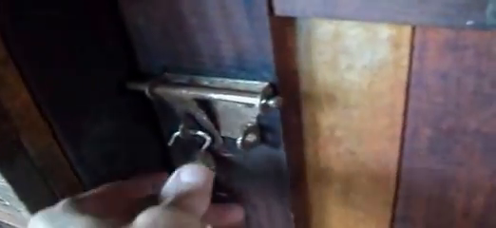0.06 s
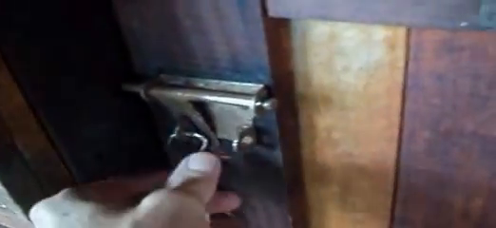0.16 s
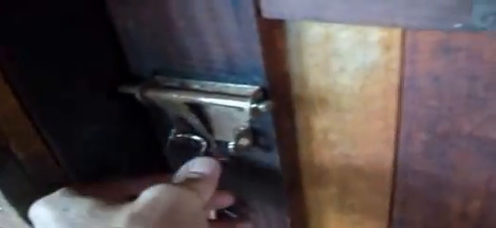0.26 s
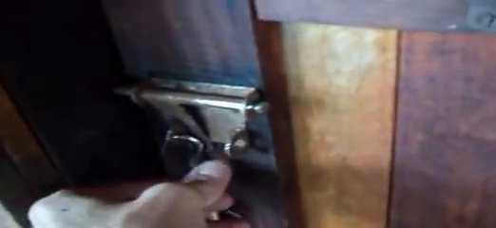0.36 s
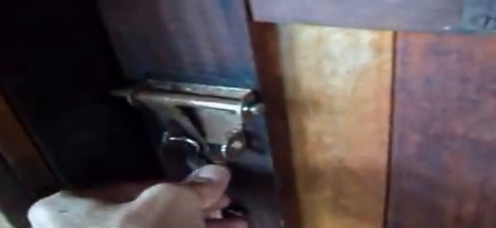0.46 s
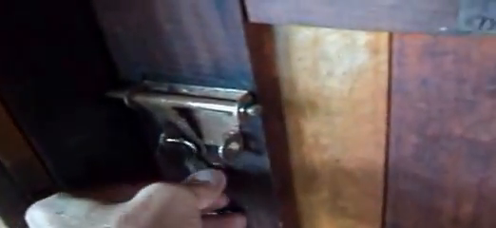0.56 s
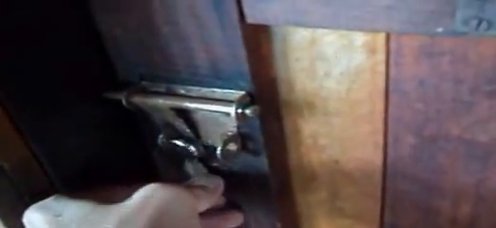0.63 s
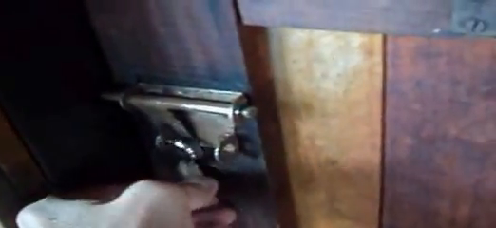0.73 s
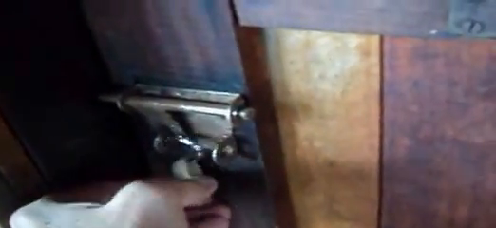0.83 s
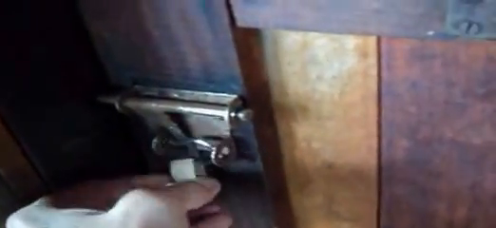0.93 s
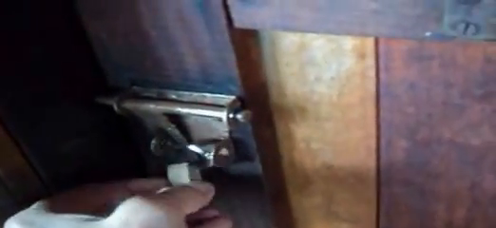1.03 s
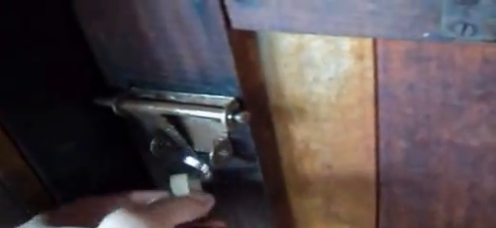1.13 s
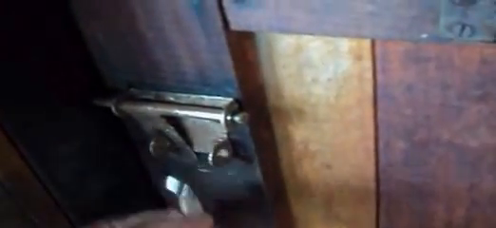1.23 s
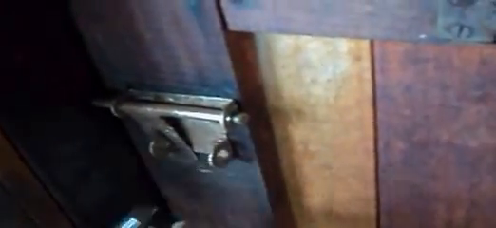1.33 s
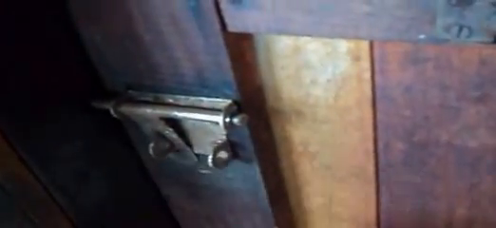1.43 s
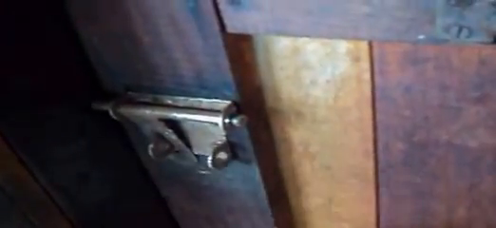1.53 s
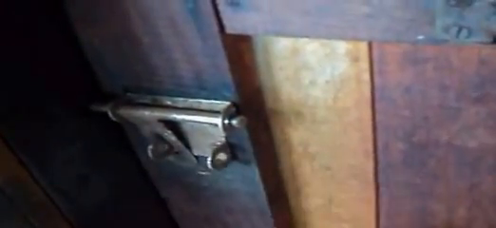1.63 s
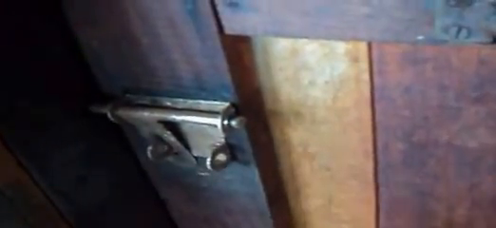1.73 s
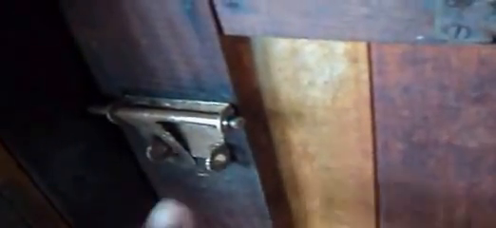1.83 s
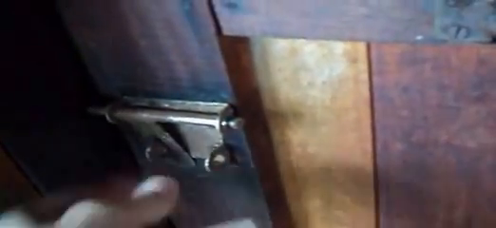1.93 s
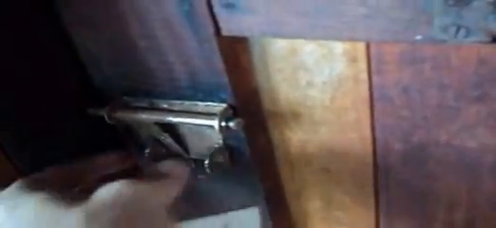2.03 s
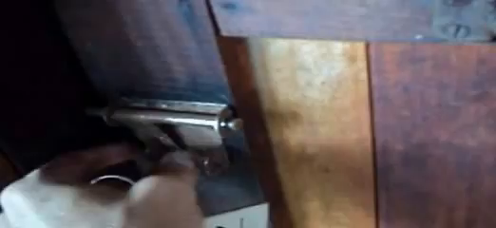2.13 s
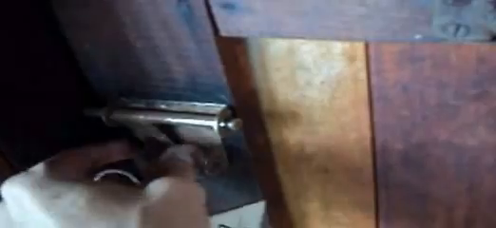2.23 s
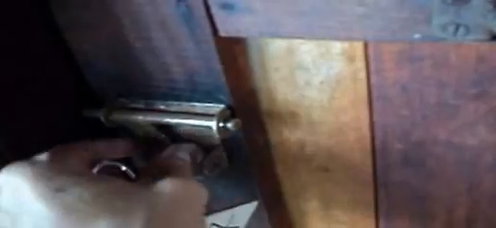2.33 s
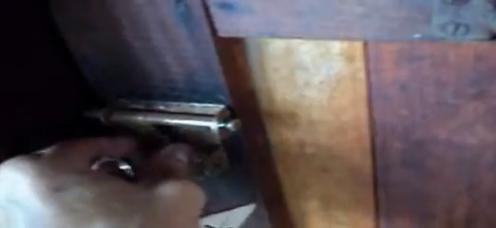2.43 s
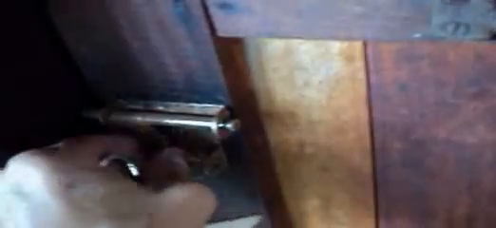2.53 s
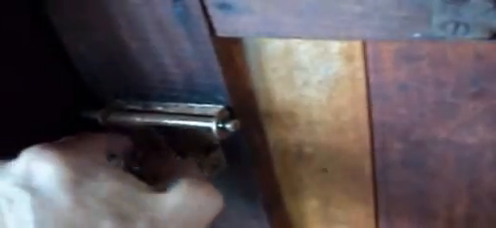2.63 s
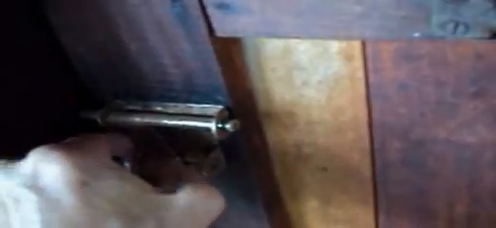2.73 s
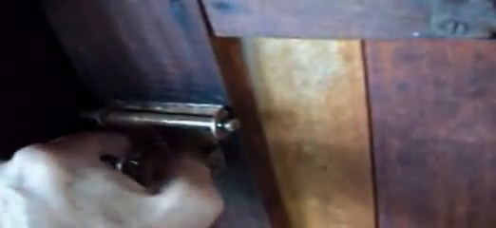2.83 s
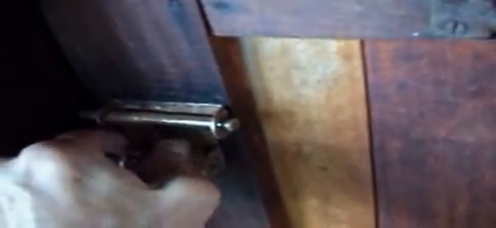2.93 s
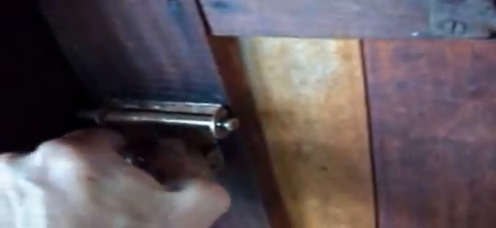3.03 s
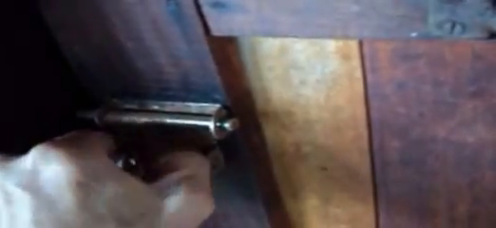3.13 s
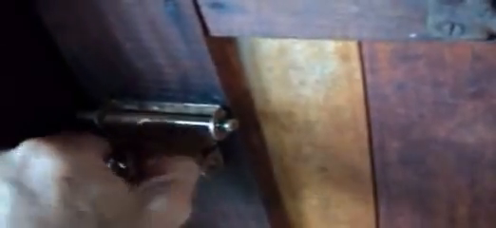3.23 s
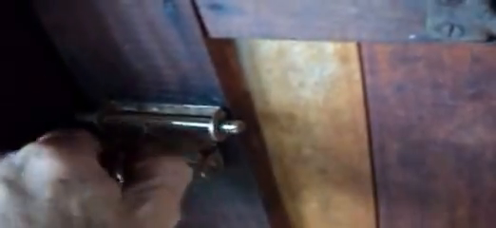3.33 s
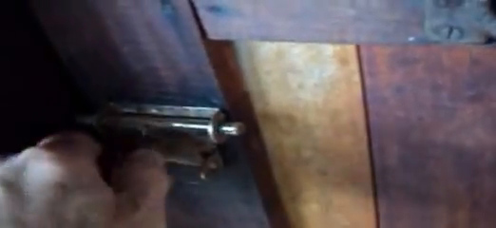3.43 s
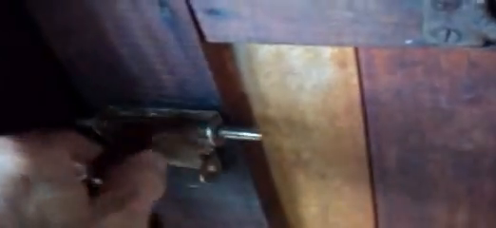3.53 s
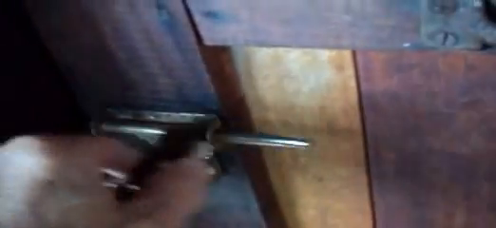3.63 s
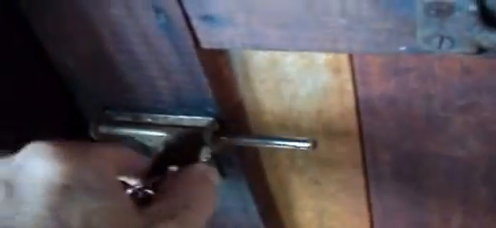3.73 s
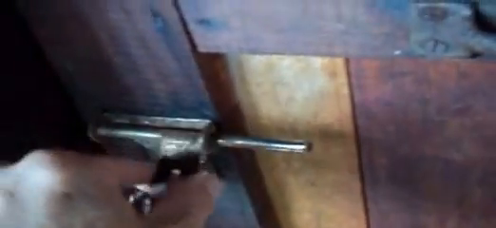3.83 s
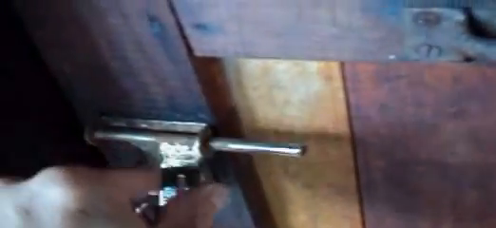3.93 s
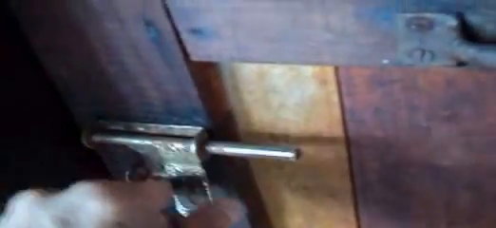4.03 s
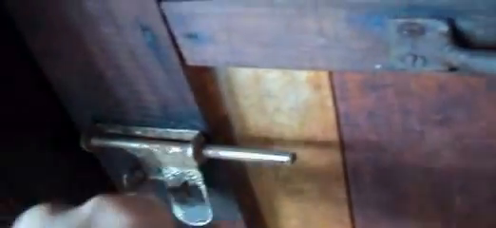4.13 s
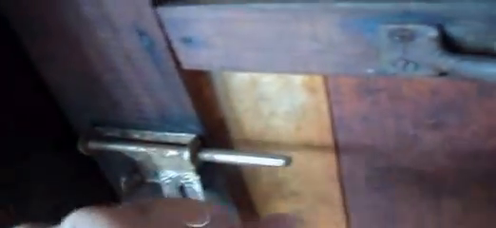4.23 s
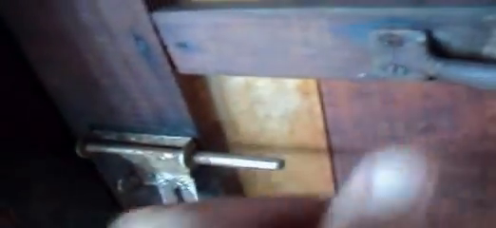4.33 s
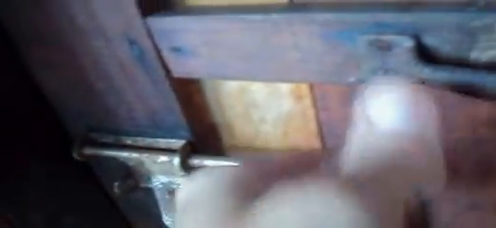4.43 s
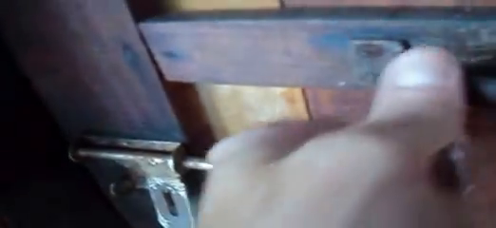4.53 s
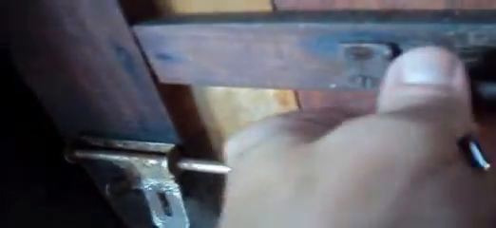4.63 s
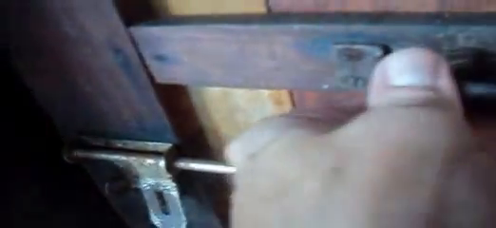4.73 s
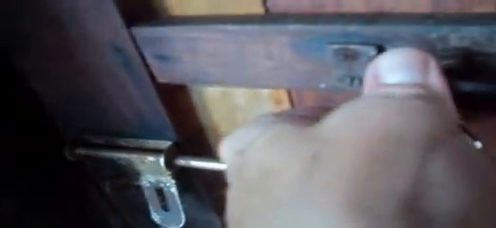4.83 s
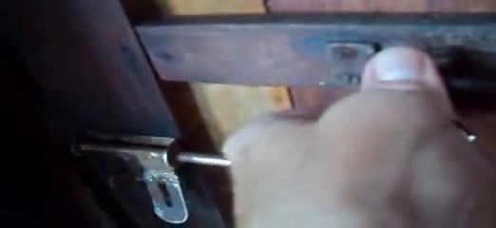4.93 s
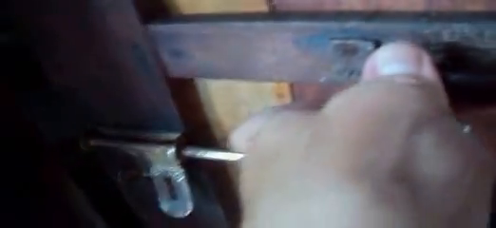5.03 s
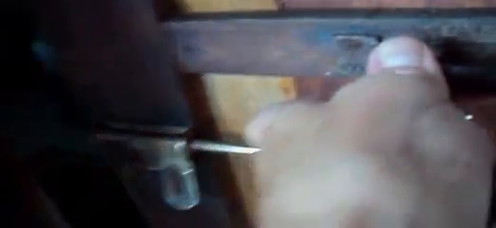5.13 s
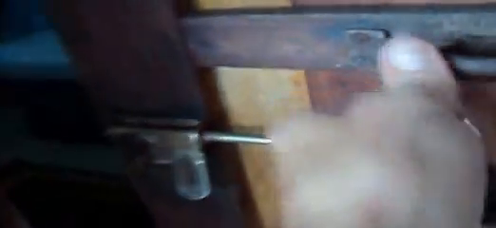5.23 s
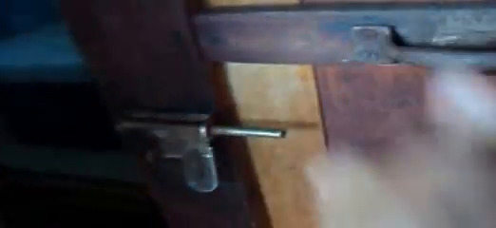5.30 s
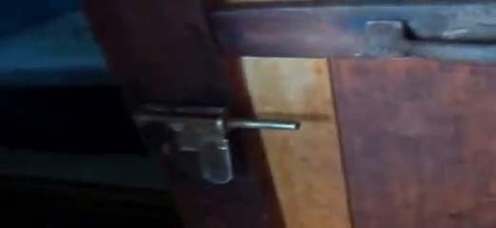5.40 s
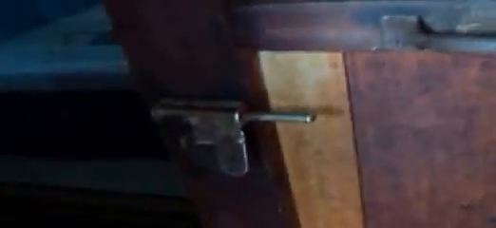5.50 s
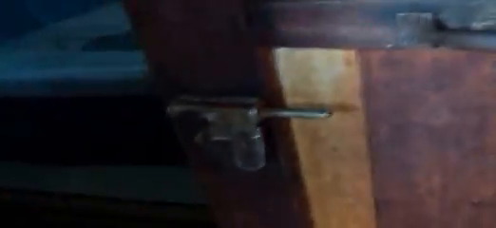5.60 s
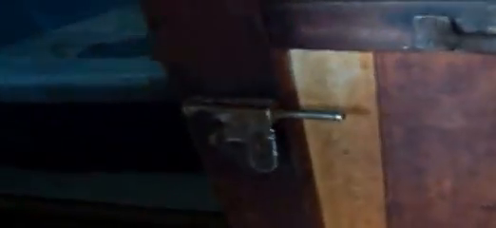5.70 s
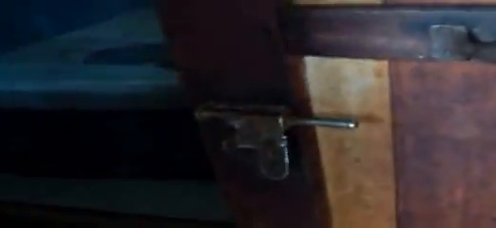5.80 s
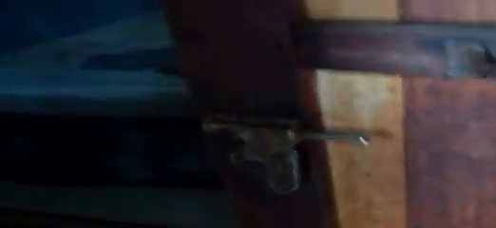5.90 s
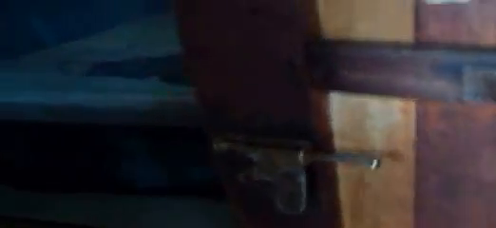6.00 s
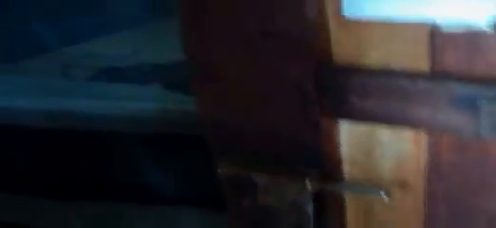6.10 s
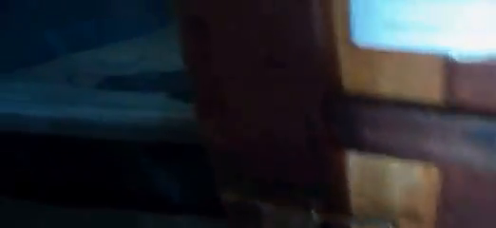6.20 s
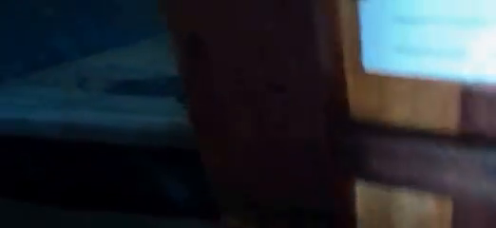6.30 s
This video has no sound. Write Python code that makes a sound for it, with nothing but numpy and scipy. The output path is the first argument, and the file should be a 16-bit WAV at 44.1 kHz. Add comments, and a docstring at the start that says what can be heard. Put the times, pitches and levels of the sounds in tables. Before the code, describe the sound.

A padlock clacks against a steel bolt as it is unhooked from a wooden door. After a short pause, fingers tap and rub the hasp. The bolt gives a tiny squeak, scrapes along its barrel and bangs on its stop. The hasp drops with a clink, and the handle knocks a few times as the door pulls free. It is heard close up in a small room with faint hum and hiss.

```python
"""A small room, close to a wooden door: a padlock is unhooked from a steel barrel bolt.
The hasp is fingered and lifted; the bolt squeaks in stick-slip, scrapes along its barrel and bangs
on its stop; the hasp drops. A hand takes the handle and pulls the door free with a few wooden knocks.
Blows ring the modes of steel and boards; friction is random slips through resonances.
Behind it: room air, a low drone, hiss, and puffs and a pop on the microphone."""
import sys
import numpy as np
from scipy import signal
from scipy.fft import rfft, irfft, next_fast_len
from scipy.io import wavfile
from scipy.ndimage import uniform_filter1d

SR = 44100
rng = np.random.default_rng(int(sys.argv[2]) if len(sys.argv) > 2 else 0)


def store_wav(level_fs):
    """Save 16-bit WAV to argv[1]."""
    pcm = np.round(np.clip(np.atleast_2d(level_fs), -1, 1) * 32767)
    wavfile.write(sys.argv[1], SR, pcm.T.astype(np.int16))


N = 280507
TIME_S = np.arange(N) / SR
RING_S = TIME_S[:SR // 4]
RELEASE_S, STOP_S = 3.413, 3.7875   # bolt breaks free, reaches its stop


def from_db(db):
    """Decibels to gain."""
    return np.exp(np.log(10) / 20 * np.asarray(db))


def unit_rms(x):
    """Scale to rms 1."""
    return x / np.sqrt(np.mean(x ** 2) + 1e-20)


def unit_attack(x):
    """Scale the loudest 4 ms to rms 1."""
    return x / np.sqrt(uniform_filter1d(x ** 2, size=176).max() + 1e-20)


def curves(rows):
    """Breakpoint columns, interpolated per sample."""
    times_s, *columns = np.transpose(rows)
    return [np.interp(TIME_S, np.sort(times_s), column) for column in columns]


def cut(x, hz, kind, order=2):
    """Butterworth low- or high-pass."""
    return signal.sosfilt(signal.butter(order, hz, kind, fs=SR, output="sos"), x + 1e-18)


def add(out, start_s, sound):
    """Mix a sound in at start_s."""
    at = max(round(start_s * SR), 0)
    out[at:at + len(sound)] += sound[:N - at]


def swells(rows, rise_share=0.45, depth_db=30):
    """Gain of strokes that each grow to a peak and die away."""
    out = np.zeros(N)
    for peak_s, length_s, db in rows:
        near = slice(*np.searchsorted(TIME_S, [peak_s - length_s, peak_s + length_s]))
        offset_s = TIME_S[near] - peak_s
        distance = np.maximum(-offset_s / rise_share, offset_s / (1 - rise_share)) / length_s
        out[near] += from_db(db - depth_db * distance)
    return out


def gate(start_s, end_s, ramp_s=0.0052):
    """Unit gate with ramped ends."""
    return np.clip(np.minimum(TIME_S - start_s, end_s - TIME_S) / ramp_s, 0, 1)


def noise(spectrum, size):
    """Coloured noise, rms 1."""
    hz, db = np.transpose(spectrum)
    padded = next_fast_len(size, True)
    bins_hz = np.maximum(np.fft.rfftfreq(padded, 1 / SR), 1)
    gain = from_db(np.interp(np.log(bins_hz), np.log(hz), db))
    return unit_rms(irfft(rfft(rng.standard_normal(padded)) * gain, padded)[:size])


def resonate(x, bands):
    """Parallel resonances, each applied twice for deep valleys; rms 1."""
    out = 0
    for k, (hz, width_hz, db) in enumerate(bands):
        b, a = signal.iirpeak(hz, hz / width_hz, fs=SR)
        drive = np.roll(x, k * SR // 7)   # decorrelates the bands
        out = out + from_db(db) * signal.lfilter(b, a, signal.lfilter(b, a, drive))
    return unit_rms(out)


def ring(modes, spread_db=2.0, rise_s=0.000067):
    """Struck modes: damped sines of alternating sign and scattered strength."""
    hz, db, t60_s = np.transpose(modes)[:, :, None]
    strength_db = db + spread_db * rng.standard_normal(db.shape)
    signs = (-1) ** np.arange(len(modes))
    swing = signs @ (from_db(strength_db - 60 * RING_S / t60_s) * np.sin(2 * np.pi * hz * RING_S))
    return unit_attack(swing * (1 - np.exp(-RING_S / rise_s)))


def friction(slips_per_s, spread_db):
    """Tiny slips of uneven size at random times."""
    sizes = from_db(spread_db * np.minimum(rng.exponential(1, N), 4)) * rng.choice([-1, 1], N)
    return sizes * (rng.random(N) < slips_per_s / SR)


# room air, hiss: f/Hz, density/dB
AIR_SPECTRUM = [(15, -55), (25, -8), (43, -7.5), (71, -9.5), (134, -11), (152, -11.5), (169, -4), (200, -3),
                (300, -9.5), (355, -8), (430, -11), (831, -12.5), (1030, -9.5), (1510, -20.5),
                (4000, -30.5), (5200, -34.5), (8800, -120)]
HISS_SPECTRUM = [(1000, 1.5), (3000, -1.5), (5000, -4), (7000, -4.5), (10000, -5.5), (10800, -28.5),
                 (12000, -73)]
# drone: f/Hz, width/Hz, level/dB
DRONE_BANDS = [(125, 56, -4), (143.8, 6.1, 4.5)]
# air puffs: peak t/s, length/s, level/dB
PUFF_SWELLS = [(0.1, 0.13, -50), (3.24, 0.27, -57), (5.13, 0.5, -41.5)]

def background(drone_hold_s=3.1, drone_fade_db_per_s=2.5):
    """Air and drone fade in, the drone later ebbs; low puffs on the microphone; steady hiss."""
    fade_in_db = -14.5 * np.exp(-TIME_S / 0.35)
    ebb_db = drone_fade_db_per_s * np.maximum(TIME_S - drone_hold_s, 0)
    air = from_db(-51 + fade_in_db) * noise(AIR_SPECTRUM, N)
    drone = from_db(-53 + fade_in_db - ebb_db) * resonate(rng.standard_normal(N), DRONE_BANDS)
    puffs = swells(PUFF_SWELLS) * unit_rms(cut(rng.standard_normal(N), 55, "low"))
    hiss = from_db(-64) * noise(HISS_SPECTRUM, N)
    return air + drone + puffs + hiss


def pop(start_s=0.0995, t60_s=0.014):
    """A pressure step at the microphone leaks away."""
    out = np.zeros(N)
    add(out, start_s, from_db(-36 - 60 * RING_S / t60_s))
    return cut(out, 4000, "low")


# frame and floor reflections: delay/s, level/dB
ROOM_ECHOES = [(.0052, -25), (.0093, -13.5), (0.018, -37.5)]

def room(x, t60_s=0.12, build_s=0.032, tail_db=-11.5, cutoff_hz=1950):
    """Direct sound plus low-passed reflections and a short tail."""
    tail = rng.standard_normal(len(RING_S)) * from_db(-60 * RING_S / t60_s)
    tail *= 1 - np.exp(-RING_S / build_s)
    response = from_db(tail_db) * tail / np.linalg.norm(tail)
    for delay_s, db in ROOM_ECHOES:
        add(response, delay_s, from_db([db]))
    return x + signal.fftconvolve(x, cut(response, cutoff_hz, "low"))[:N]


# finger strokes: peak t/s, length/s, level/dB, wood re metal/dB
RUB_SWELLS = [(0.772, 0.48, -43, -7.5), (1.036, 0.78, -50, 4), (2.9, 0.14, -45.5, -2),
              (3.223, 0.28, -40, -4.5), (3.382, 0.38, -47.5, -6.5), (4.061, 0.61, -48, 4),
              (4.943, 0.29, -47.5, 5), (5.063, 0.39, -45.5, -0.5), (5.32, 0.82, -57.5, 6)]
# door shudders: t/s, level/dB
DOOR_SHUDDERS = [(3.2, -54), (3.81, -32), (5.106, -45)]
# rubbed fittings, wood: f/Hz, width/Hz, level/dB
METAL_BANDS = [(901, 110, 4), (1268, 250, -7), (2800, 1100, -23.5)]
WOOD_BANDS = [(99, 71, 1), (273, 193, 0.5), (444, 440, -6)]

def handling(shudder_t60_s=0.2):
    """Fingers rub the fittings; the door shifts and shudders in its frame."""
    metal_gain = swells([(s, length_s, db) for s, length_s, db, _ in RUB_SWELLS])
    wood_gain = swells([(s, length_s, db + wood_db) for s, length_s, db, wood_db in RUB_SWELLS])
    for start_s, db in DOOR_SHUDDERS:
        add(wood_gain, start_s, from_db(db - 60 * TIME_S[:SR] / shudder_t60_s))
    metal = resonate(friction(slips_per_s=1200, spread_db=3.5), METAL_BANDS)
    wood = resonate(friction(slips_per_s=700, spread_db=1.5), WOOD_BANDS)
    return metal_gain * metal + wood_gain * wood


# shackle strokes: peak t/s, length/s, level/dB
DRAG_SWELLS = [(0.78, 0.29, -55.5), (1.12, 0.063, -52), (1.18, 0.15, -60)]
# shackle resonances: f/Hz, width/Hz, level/dB
DRAG_BANDS = [(2780, 490, 1), (3450, 410, 1), (5740, 840, -19)]

def shackle_drag():
    """The shackle rasps through the staple."""
    return swells(DRAG_SWELLS) * resonate(friction(slips_per_s=840, spread_db=6.0), DRAG_BANDS)


# loose steel ticks: t/s, level/dB
JINGLE_TICKS = [(0.2014, -52.5), (1.1109, -50), (1.1374, -53), (1.1784, -49), (1.2087, -52), (1.842, -51),
                (3.198, -37.5), (3.228, -47), (4.145, -30.5), (4.9882, -45.5)]
# loose steel: f/Hz, density/dB
JINGLE_SPECTRUM = [(1000, -15), (2200, 0), (2700, 8), (3500, 4.5), (4400, -15), (5700, -2), (8000, -17),
                   (12000, -45)]
# lock ping: f/Hz, level/dB, t60/s
PING_MODES = [(2220, -4, 0.027), (2350, -9, 0.048)]

def loose_steel(trim_db=-2, t60_s=0.029, ping_s=1.841):
    """Shackle, hasp and fittings tick and clink in short noise bursts; the lock pings once."""
    out = np.zeros(N)
    for start_s, db in JINGLE_TICKS:
        rattle = noise(JINGLE_SPECTRUM, len(RING_S)) * from_db(-60 * RING_S / t60_s)
        add(out, start_s, from_db(db + trim_db) * unit_attack(rattle))
    add(out, ping_s, from_db(-47.5) * ring(PING_MODES))
    return out


# steel-on-steel crack: f/Hz, density/dB
CRACK_SPECTRUM = [(300, -10), (700, 12.5), (1200, 14.5), (1900, -11.5), (2900, -11.5), (4300, -23.5),
                  (5600, -26.5), (7000, -29), (9500, -31), (14000, -37)]
# door boards, whole leaf: f/Hz, level/dB, t60/s
BOARD_MODES = [(216, -4, 0.028), (315.4, 5, 0.023), (329.8, -10.5, 0.1), (438, -13.5, 0.078),
               (592, -23, 0.038)]
LEAF_MODES = [(99, -11, 0.099), (115.8, -10, 0.68), (137, 1, 0.21)]

def blows(hits, modes, *, crack_db, crack_t60_s, ring_db, thud_db, thud_hz, leaf_db,
          click_db, click_db_per_db, bounce_s, bounce_loss_db):
    """Steel cracks, rings and shakes the door; force adds treble; one weaker, duller rebound each."""
    split_hz, rise_s, firm_force_db, bounce_dulling_db = 2300, 0.00044, -30, 2
    out = np.zeros(N)
    burst = from_db(-60 * RING_S / crack_t60_s) * (1 - np.exp(-RING_S / rise_s))
    for start_s, force_db, door_db in hits:
        treble_db = click_db + click_db_per_db * (force_db - firm_force_db)
        # softer contacts reach only the lower board modes
        boards = cut(cut(ring(BOARD_MODES), 170, "high"), thud_hz, "low", order=4)
        thud = unit_attack(boards) + from_db(leaf_db) * ring(LEAF_MODES)
        for bounce in range(2):
            steel = ring(modes)
            steel += from_db(crack_db) * unit_attack(noise(CRACK_SPECTRUM, len(RING_S)) * burst)
            body = from_db(ring_db) * unit_attack(cut(steel, split_hz, "low", order=4))
            click = unit_attack(cut(steel, split_hz, "high", order=4))
            click *= from_db(treble_db - bounce * bounce_dulling_db)
            contact = body + click + from_db(door_db + thud_db) * thud
            add(out, start_s + bounce * bounce_s, from_db(force_db - bounce * bounce_loss_db) * contact)
    return out


# handle knocks: t/s, force/dB, thud trim/dB
HANDLE_KNOCKS = [(4.7815, -52, 18.5), (4.893, -45, 7), (4.9435, -35.5, -9), (4.9565, -42.5, 9.5),
                 (5.0096, -37.5, -12), (5.081, -32, 3), (5.0945, -29, 4.5)]
# handle: f/Hz, level/dB, t60/s
HANDLE_MODES = [(403, -13, 0.068), (680, 7, 0.048), (750, -3, 0.045), (844, -3, 0.051), (950, -8, 0.045),
                (1270, -5, 0.055), (2540, -28, 0.025), (3380, -22, 0.026)]

def handle():
    """The handle takes the pull and the door knocks free."""
    return blows(HANDLE_KNOCKS, HANDLE_MODES, crack_db=2.0, crack_t60_s=0.041, ring_db=0,
                 thud_db=-0.5, thud_hz=433, leaf_db=-17,
                 click_db=-16.5, click_db_per_db=0.043, bounce_s=0.0095, bounce_loss_db=17)


# padlock knocks: t/s, force/dB, thud trim/dB
PADLOCK_KNOCKS = [(0.773, -35.5, -10.5), (0.9415, -23, -7), (0.9985, -34, -11), (1.0014, -19, -10.5),
                  (1.1165, -38.5, -4.5)]
# padlock: f/Hz, level/dB, t60/s
PADLOCK_MODES = [(760, -16, 0.055), (887, 10.5, 0.07), (930, 2, 0.068), (1070, 5, 0.027), (1230, 7, 0.037),
                 (1328, -4, 0.062), (1700, -6, 0.043), (1870, -6.5, 0.079), (2590, -30, .05),
                 (3400, -23, 0.035), (4080, -14, 0.031), (4880, -4, 0.012), (5400, -19.5, 0.015),
                 (6030, -7.5, 0.012)]

def padlock():
    """The padlock knocks against the staple."""
    return blows(PADLOCK_KNOCKS, PADLOCK_MODES, crack_db=2.0, crack_t60_s=0.037, ring_db=-2.5,
                 thud_db=0.5, thud_hz=690, leaf_db=-27,
                 click_db=-16, click_db_per_db=0.4, bounce_s=0.0155, bounce_loss_db=5.5)


# hasp taps: t/s, force/dB, thud trim/dB
HASP_TAPS = [(0.3028, -50, -3), (0.4965, -42.5, -25), (2.485, -43.5, 2), (2.638, -34.5, 0),
             (2.7527, -43, -18), (2.8428, -38, -5), (2.8824, -45, -15), (2.9094, -39.5, -11),
             (3.1668, -37.5, 0), (3.192, -31, -3), (3.459, -36.5, 3), (3.4816, -44.5, 2),
             (3.5205, -42.5, -14), (4.1425, -28, -3), (4.1457, -26, -2), (4.2155, -36, 0),
             (4.865, -38, -20)]
# hasp: f/Hz, level/dB, t60/s
HASP_MODES = [(630, -3, 0.038), (922.8, 11.5, 0.072), (1167, -1.5, 0.013), (1301, 0.5, 0.029),
              (1260, -37, 0.062), (2440, -19.5, 0.032), (2790, -19.5, 0.014), (3320, -35, 0.1),
              (5200, -41, .025), (8060, -31.5, 0.038)]

def hasp():
    """The hasp taps and drops on its plate."""
    return blows(HASP_TAPS, HASP_MODES, crack_db=-1.5, crack_t60_s=0.035, ring_db=0.5,
                 thud_db=-5.0, thud_hz=710, leaf_db=-17,
                 click_db=-12.5, click_db_per_db=0.92, bounce_s=0.0072, bounce_loss_db=8)


# barrel, free rod end: f/Hz, level/dB, t60/s
BARREL_MODES = [(1455, -16, 0.081), (1734, 3, 0.062), (1980, -11, 0.19)]
ROD_MODES = [(2700, -1, 0.2), (5640, -2, 0.3)]

def bolt_ring():
    """The barrel rings on after the release, the rod after the stop."""
    out = np.zeros(N)
    add(out, RELEASE_S, from_db(-29.5) * ring(BARREL_MODES))
    add(out, STOP_S, from_db(-59) * ring(ROD_MODES))
    return out


# stick-slip: t/s, f/Hz, level/dB
SQUEAK_CURVE = [(3.392, 1370, -72), (3.402, 1350, -43), (3.408, 1570, -25.5), (3.412, 1500, -29),
                (3.417, 1800, -52), (3.425, 1640, -66)]
# harmonics: order, level/dB
SQUEAK_HARMONICS = [(1, 2.5), (2, -2.5), (3, -24)]
# singing barrel: f/Hz, width/Hz, level/dB
SINGING_BANDS = [(7960, 310, 2), (9700, 490, -12), (13000, 960, -11)]

def bolt_squeak(jitter=0.0195, singing_db=-20):
    """Steel briefly sticks and slips at a wavering, rising rate; the barrel sings above it."""
    hz, level_db = curves(SQUEAK_CURVE)
    waver = unit_rms(cut(rng.standard_normal(N), 410, "low"))
    phase = 2 * np.pi * np.cumsum(hz * (1 + jitter * waver)) / SR
    tone = unit_rms(sum(from_db(db) * np.sin(order * phase) for order, db in SQUEAK_HARMONICS))
    singing = from_db(singing_db) * resonate(rng.standard_normal(N), SINGING_BANDS)
    active = (TIME_S > SQUEAK_CURVE[0][0]) & (TIME_S < SQUEAK_CURVE[-1][0])
    return from_db(level_db) * (tone + singing) * active


# long stroke friction: t/s, level/dB
STROKE_CURVE = [(3.585, -53), (3.591, -50), (3.643, -33), (3.691, -25), (3.778, -32)]
# barrel and door, bolt edge: f/Hz, width/Hz, level/dB
GRIND_BANDS = [(129, 66, -18), (299, 100, 3.5), (394, 29, 1), (475, 93, 4.5), (604, 34, -1),
               (886, 170, 2.5), (1168, 140, -3), (1374, 190, -2.5), (1706, 145, -7), (1700, 170, -7),
               (1862, 135, -7.5)]
CHATTER_BANDS = [(2380, 180, -3), (2743, 280, 2), (3300, 880, -13), (5400, 1070, -15.5), (8170, 730, -18),
                 (9570, 890, -23.5), (12500, 1300, -27)]

def bolt_slide(shove_s=3.405, shove_length_s=0.045, snag_s=3.75, snag_length_s=0.021, bite_db_per_s=40):
    """A shove, then a long stroke: dense slips grind; the edge bites ever harder and snags once."""
    start_s = STROKE_CURVE[0][0]
    shove = from_db(-35.5) * gate(shove_s, shove_s + shove_length_s)
    stroke = from_db(curves(STROKE_CURVE)[0]) * gate(start_s, STOP_S)
    motion = shove + stroke
    bite = from_db(-18 + bite_db_per_s * (np.clip(TIME_S, start_s, STOP_S) - start_s))
    snag = swells([(snag_s, snag_length_s, -35)])
    grind = resonate(friction(slips_per_s=3300, spread_db=4.0), GRIND_BANDS)
    chatter = resonate(friction(slips_per_s=950, spread_db=2.5), CHATTER_BANDS)
    return motion * grind + (motion * bite + snag) * chatter


# bolt knocks: t/s, force/dB, thud trim/dB
BOLT_KNOCKS = [(3.41, -35.5, 4.5), (3.5935, -41, -5), (3.7843, -21, 4), (3.8025, -52, 20.5)]
# bolt: f/Hz, level/dB, t60/s
BOLT_MODES = [(750, 3.5, 0.039), (826, 8.5, 0.058), (972, 0, 0.072), (1194, 3.5, 0.053), (1440, -18, 0.029),
              (1780, -17, .03), (2740, -1.5, 0.015), (2930, -17, 0.044), (5000, -12, 0.0086),
              (5590, -2.5, 0.011)]

def bolt_knocks():
    """The bolt knocks in its barrel and bangs on its stop."""
    return blows(BOLT_KNOCKS, BOLT_MODES, crack_db=-1.0, crack_t60_s=0.034, ring_db=0,
                 thud_db=1.5, thud_hz=800, leaf_db=-24.5,
                 click_db=-11.5, click_db_per_db=0.46, bounce_s=0.0033, bounce_loss_db=7.0)


def scene():
    """Door and fittings in the room, over the background; mono."""
    knocks = padlock() + hasp() + bolt_knocks() + handle()
    light_steel = shackle_drag() + loose_steel()
    bolt = bolt_ring() + bolt_slide() + bolt_squeak()
    door = knocks + light_steel + bolt + handling()
    return (room(door) + pop() + background())[None]


def record(dry):
    """Steep elliptic low-pass at 14.2 kHz."""
    return signal.sosfilt(signal.ellip(10, 0.2, 70, 14200, fs=SR, output="sos"), dry)


dry = scene()
out = record(dry)
store_wav(out)
```